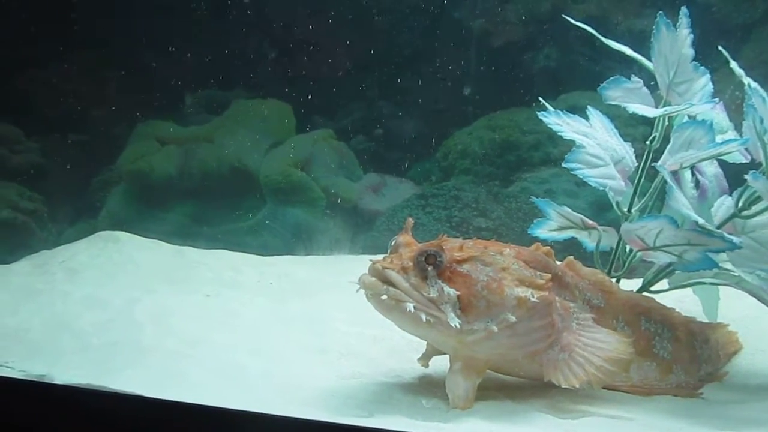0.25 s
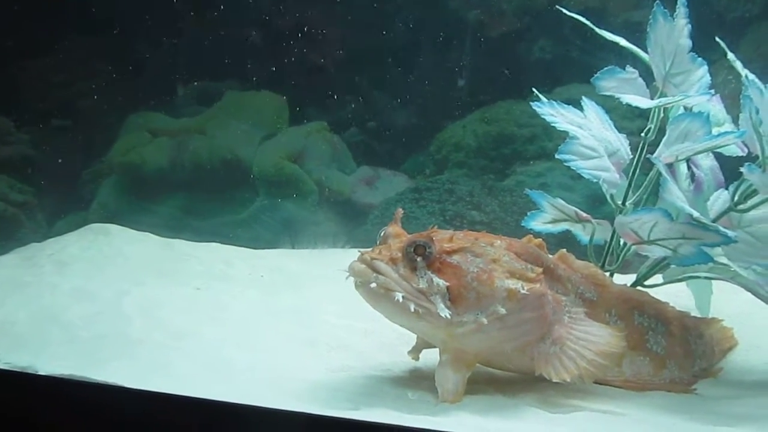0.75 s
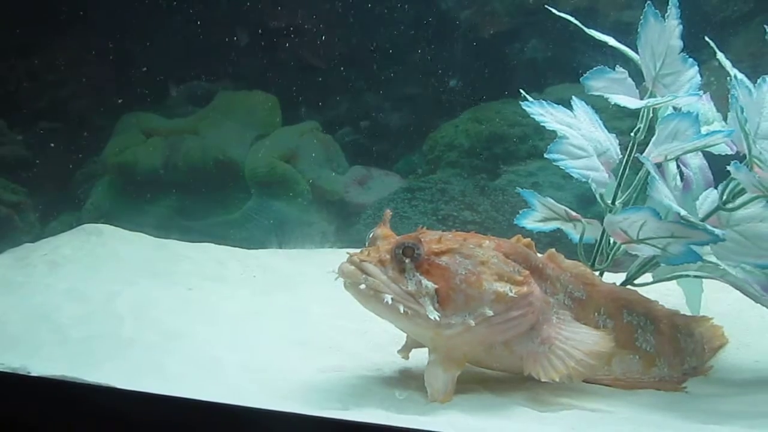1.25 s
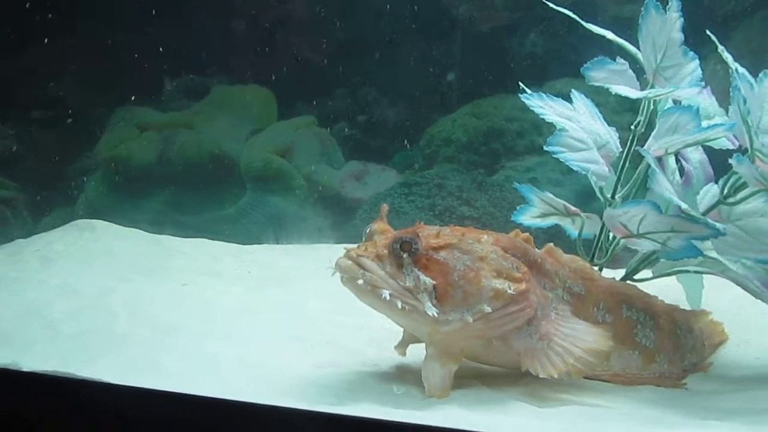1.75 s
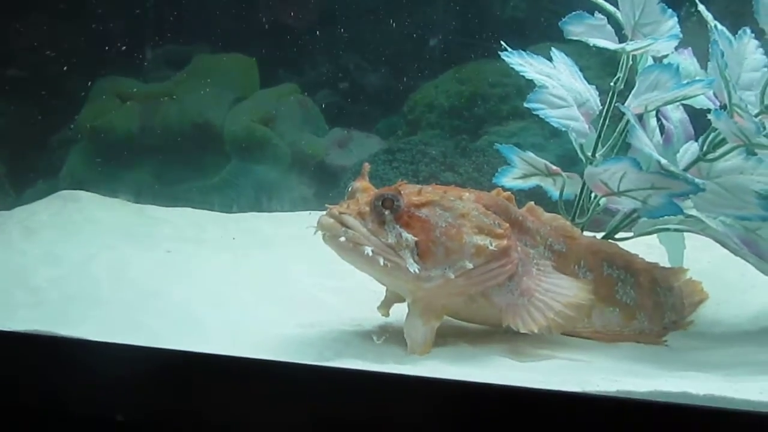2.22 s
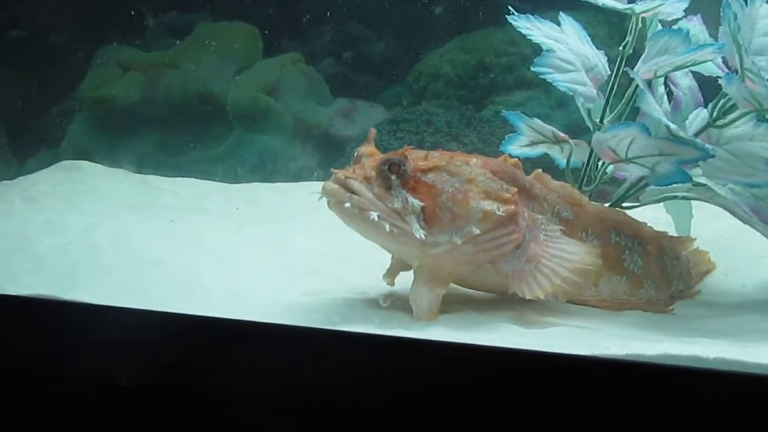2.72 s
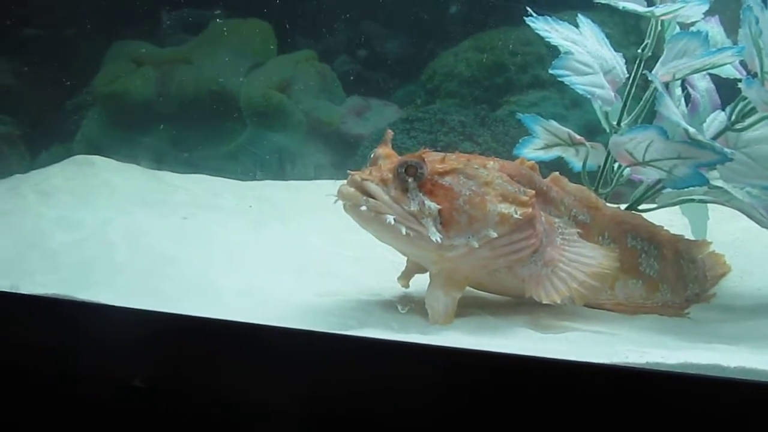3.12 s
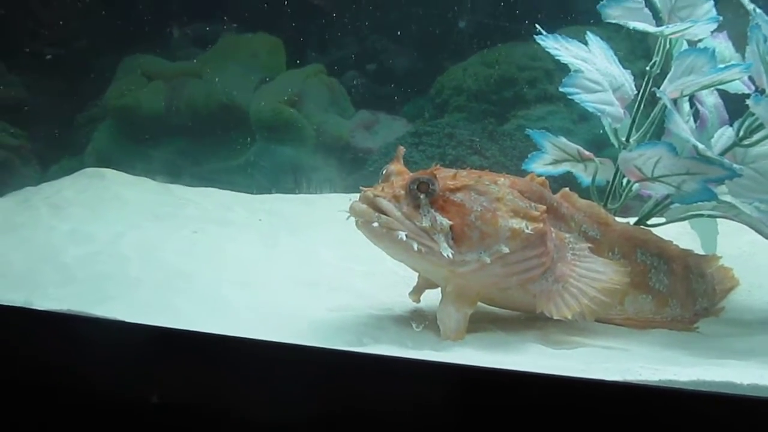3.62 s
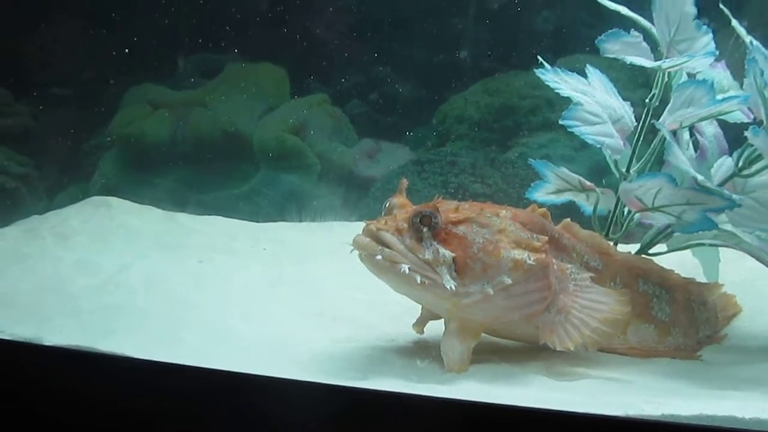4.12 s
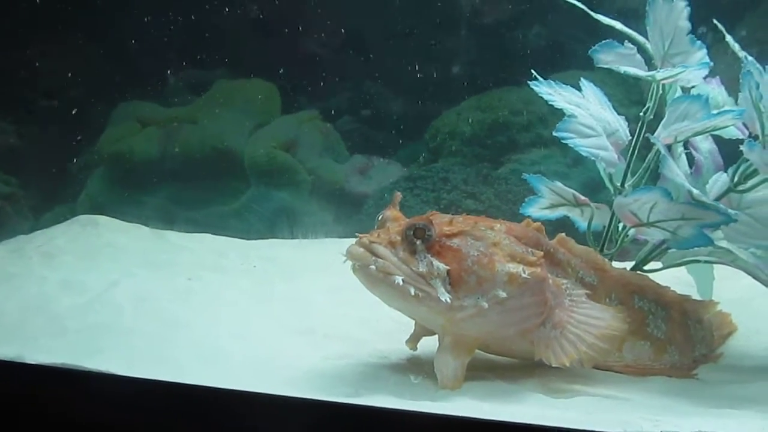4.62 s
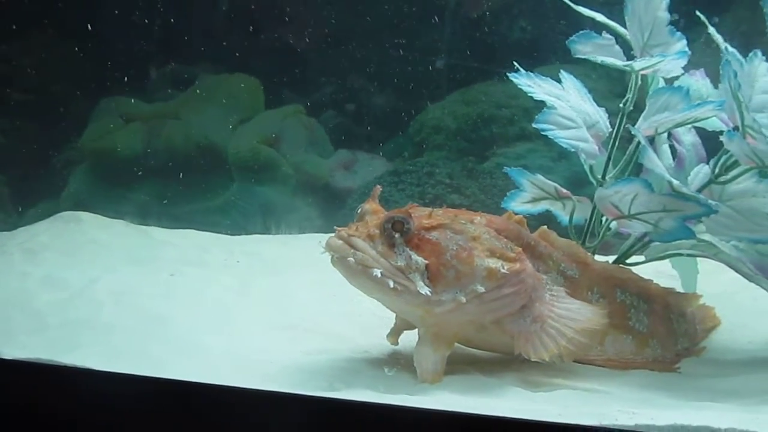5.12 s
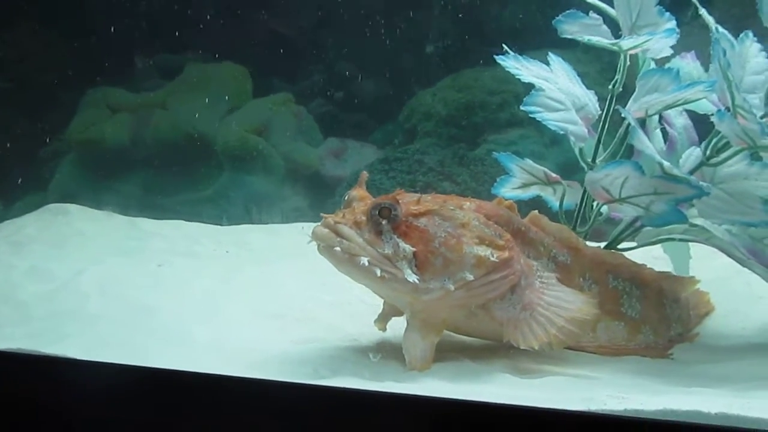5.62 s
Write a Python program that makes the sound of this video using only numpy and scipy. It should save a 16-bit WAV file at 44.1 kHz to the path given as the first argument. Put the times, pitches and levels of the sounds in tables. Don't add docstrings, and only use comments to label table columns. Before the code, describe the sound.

From the start, water trickles and drips close by: many tiny bright plinks, bubbly blips, crackling spray and crisp ticks over a soft wash and a very faint low pump hum. A faint hollow gurgle of air in a pipe swells around 0.3 s and fades by about 1 s; another quieter one rises from 2.2 to 2.8 s. At 1.7 s a small hard object is tapped down with a short, dry click. A tiny creak precedes a sharp, woody knock at 3.8 s, with smaller bumps just after. The flow seems slightly fuller from here, with light contacts around 4.35 to 4.6 s and a faint creak. At 5.5 s a loud, uneven rattling clatter erupts, with two strong thumps, rasping and bright metallic scraping, fading within about a quarter second. A few weak drips and trickling remain to the end, near 5.9 s. Close stereo pickup, small indoor space.

```python
import sys
import numpy as np
from scipy import signal
from scipy.fft import rfft, irfft, next_fast_len
from scipy.io import wavfile
from scipy.ndimage import uniform_filter1d

SR = 44100
rng = np.random.default_rng(int(sys.argv[2]) if len(sys.argv) > 2 else 0)


def makeup_ratio(level_db):
    decades = np.asarray(level_db, float) / 20
    return 10 ** decades


def dump(signal):
    limited = np.clip(np.atleast_2d(signal).T, -1, 1)
    pcm = np.round(limited * 32767).astype(np.int16)
    wavfile.write(sys.argv[1], SR, pcm)


N = 258426
T = np.arange(N) / SR
PADDED = next_fast_len(N, real=True)

# start in seconds, bubble pitch in Hz, peak in dB, length in ms.
DRIPS = [(0.322, 1482, -39.5, 22), (3.115, 1410, -44.5, 8.5), (0.435, 1600, -36, 7.8),
         (0.691, 3400, -46, 3.6), (0.8, 3640, -46, 3.2), (0.898, 2450, -37, 3.4), (1.083, 3570, -44, 2.8),
         (1.313, 3480, -41.5, 4.3), (1.511, 2066, -40, 5.6), (1.573, 2700, -46, 4.1),
         (1.877, 2040, -46.5, 9), (1.904, 3600, -36, 3.5), (1.908, 2950, -37, 3.7), (2.097, 2080, -37, 3),
         (2.162, 3640, -39.5, 3.6), (2.209, 2260, -38, 3.2), (2.317, 2640, -38.5, 4.2),
         (2.493, 2810, -37, 2.8), (2.708, 3570, -41.5, 3.6), (2.919, 1780, -48, 6.7),
         (2.938, 2240, -36.5, 5.7), (3.059, 2280, -41.5, 4.8), (3.136, 3650, -38.5, 3.8),
         (3.183, 2270, -38, 5.7), (3.189, 2440, -33, 2.9), (3.752, 3550, -39, 4.2), (3.912, 2420, -42, 8.3),
         (4.097, 1920, -33.5, 4.5), (4.12, 1960, -42, 4.1), (4.345, 2840, -31, 3.2),
         (4.508, 1870, -37, 3.9), (4.572, 1480, -42, 5), (4.589, 1760, -38, 3.2), (4.613, 1470, -46, 5),
         (5.797, 4820, -50, 4), (5.8076, 2420, -49, 5), (5.848, 4830, -52, 4)]
# start in seconds, pitch in Hz, peak in dB, length in ms.
BUBBLE_RUNS = [(1.905, 930, -45.5, 8), (3.205, 2400, -46, 9), (3.233, 2455, -44, 9.1),
               (3.265, 2420, -51, 9), (4.158, 2950, -49, 4.3), (4.162, 2380, -47, 5),
               (4.206, 2970, -39.5, 4), (4.223, 3030, -41, 8.1), (4.242, 3000, -47, 4.1),
               (4.365, 3040, -43, 5.9), (4.384, 3100, -41, 3.7), (5.367, 1680, -43.5, 8.5),
               (5.385, 1600, -51, 7.9), (5.433, 2370, -41.5, 5), (5.451, 2400, -58, 5.1),
               (5.473, 2400, -44, 3.9)]
# start in seconds, peak in dB, pitch in Hz, length in ms.
GLUGS = [(0.684, -45, 930, 5.8), (2.105, -41.5, 1000, 7.4), (2.18, -41, 764, 9), (2.19, -42.5, 788, 9),
         (2.299, -45.5, 733, 9.7), (2.446, -49, 738, 13.4), (2.511, -46, 1058, 19), (2.587, -41, 880, 7.1),
         (2.757, -46, 1055, 5.9), (3.096, -45, 913, 8), (3.111, -43, 890, 6.1), (3.775, -46, 565, 8.6),
         (4.299, -45, 1060, 8.3), (4.583, -40.5, 1140, 5.4), (4.597, -47, 1087, 19),
         (4.649, -47.5, 724, 12), (4.714, -48, 1040, 8.3), (4.899, -44.5, 725, 12)]
# start in seconds, peak in dB, bubble pitch in Hz.
DROPLETS = [(0.0518, -44, 6150), (0.2124, -45, 4120), (0.4785, -40.5, 4540), (0.5026, -43.5, 7250),
            (0.7128, -55, 4690), (0.7652, -40.5, 4220), (0.7965, -46, 4140), (0.9363, -38.5, 5100),
            (0.995, -41.5, 4570), (1.0575, -45, 6850), (1.1488, -36.5, 6220), (1.255, -45, 4130),
            (1.2805, -36, 6300), (1.3257, -41, 4900), (1.458, -43, 4860), (1.511, -47, 4310),
            (1.5284, -43, 4150), (1.5775, -44, 4330), (1.709, -56, 4100), (1.729, -52, 4200),
            (1.7554, -56, 4820), (1.7976, -38.5, 4870), (1.831, -43, 6730), (1.9006, -61, 4480),
            (2.0208, -51, 4840), (2.1475, -62, 5150), (2.1625, -53, 4150), (2.2525, -38, 4350),
            (2.3535, -45, 5070), (2.4862, -53, 5240), (2.588, -36.5, 4270), (2.7124, -43, 4090),
            (2.757, -44, 4310), (2.8554, -47, 6710), (2.9826, -42, 4940), (3.083, -40, 4900),
            (3.1353, -53, 4050), (3.21, -45, 5240), (3.2405, -59, 4300), (3.4411, -38.5, 4970),
            (3.5314, -44, 5200), (3.7229, -50, 4170), (3.752, -35.5, 5220), (3.8308, -39, 5310),
            (3.9215, -38.5, 6880), (4.0168, -48, 4640), (4.2393, -50, 4930), (4.3316, -38, 4720),
            (4.3445, -39, 5140), (4.588, -41, 4140), (4.6391, -32.5, 4330), (4.7765, -41.5, 4840),
            (4.8793, -39, 6550), (4.977, -40, 4210), (5.2904, -47, 4170), (5.3144, -37.5, 4870)]
# start in seconds, peak in dB, bubble pitch in Hz.
BLIPS = [(0.0992, -44, 2470), (0.1194, -47, 2500), (0.2179, -44.5, 3080), (0.2853, -44, 3730),
         (0.402, -50, 2720), (0.5511, -43.5, 3110), (0.6479, -50, 2620), (0.6714, -48, 2640),
         (0.6888, -43, 2940), (1.2486, -38.5, 2760), (1.2944, -43, 2345), (1.7983, -44, 2240),
         (2.361, -43, 2340), (2.592, -43, 2800), (2.6379, -44, 3220), (2.8863, -45, 3880),
         (2.9108, -49, 2240), (3.0415, -39, 2460), (3.5294, -42, 3500), (4.4802, -51, 2340),
         (4.6379, -32.5, 3730), (4.7785, -40, 3630), (5.1362, -43, 2270), (5.2894, -43, 3860)]
# start in seconds, peak in dB, pitch in Hz.
TICKS = [(0.0687, -50, 10600), (0.2114, -50, 13100), (0.3441, -56, 13500), (0.369, -45.5, 9200),
         (0.407, -47, 10700), (0.4783, -51, 8970), (0.5067, -50, 8320), (0.6584, -41.5, 8400),
         (0.7696, -52, 8850), (0.8375, -54, 8700), (0.8669, -57, 9050), (0.8864, -49, 8750),
         (0.9487, -53, 8800), (1.0575, -59, 8560), (1.199, -50, 8600), (1.2805, -53, 8760),
         (1.327, -47, 8900), (1.3523, -50, 10900), (1.4386, -50, 8900), (1.4637, -49, 8300),
         (1.512, -50, 8390), (1.537, -44, 8500), (1.5728, -50, 10400), (1.7549, -57, 10500),
         (1.804, -49, 8400), (1.8317, -50, 8590), (1.9046, -50, 8200), (2.0223, -50, 8000),
         (2.0634, -44.5, 8900), (2.0877, -52, 11300), (2.2524, -44, 9000), (2.4912, -55, 11200),
         (2.5875, -60, 10500), (2.6858, -56, 8350), (2.8896, -42.5, 10600), (3.033, -50, 9600),
         (3.1278, -52, 10500), (3.357, -48, 8730), (3.3842, -47, 10200), (3.5319, -53, 9120),
         (3.6114, -47, 8720), (3.7623, -49, 8890), (3.93, -47, 12900), (3.9814, -46, 8100),
         (4.0133, -45, 10800), (4.3215, -43, 8160), (4.3445, -47, 8200), (4.5885, -51, 8870),
         (4.6374, -59, 8100), (4.7611, -52, 8850), (4.778, -49, 8420), (4.8424, -52, 8290),
         (4.8833, -51, 11000), (4.9467, -48, 14200), (4.9965, -51, 13000), (5.086, -52, 13800),
         (5.1028, -48, 11500), (5.173, -44, 8640), (5.21, -45, 9400), (5.213, -52, 13500)]
DROPLET_CYCLES, BLIP_CYCLES, TICK_CYCLES = 10.8, 11.8, 7.1
DROPLET_DB, BLIP_DB = -3, -4
TICK_LEFT_DB, PAN_SCATTER_DB = 9, 2
# pitch in Hz, level in dB.
FIZZ = [(600, -9.5), (1500, 1.5), (3000, 3.5), (6000, 2), (12000, -9.5)]
SNAP_DB, SNAP_S = -8.5, 0.0018

# start, swell, hold and fade in seconds, level in dB.
GURGLES = [
    (0.1, 0.055, 0.06, 0.089, -58),
    (0.263, 0.042, 0.13, 0.66, -50.5),
    (2.197, 0.1, 0.42, 0.07, -54),
]
PIPE_HZ, PIPE_WIDTH_HZ = 1520, 230

CLATTER_S, CLATTER_DB, ATTACK_S, HOLD_S, LET_GO_S = 5.498, -27, 0.022, 0.074, 0.028
LET_GO_DB, FADE_DB_PER_S, FADE_DB_PER_S2 = -5, 35.5, 305
SHAKE_DB, SHAKE_T60_S = 4.5, 0.098
# centre in seconds, depth in dB, half length in seconds.
LULLS = [
    (5.531, -3, 0.0036),
    (5.562, -4, 0.0048),
    (5.603, -3.5, .004),
    (5.655, -4.5, .008),
]
# frequency in Hz, density in dB per Hz.
RASP = [(35, -38), (60, -42), (327, -9), (509, -7), (559, -3.5), (1070, -1.5), (3270, -13.5), (5840, -21.5),
        (11200, -35.5), (15500, -50)]
# start in seconds, level in dB, hold in seconds, ringing in dB.
SCRAPES = [
    (5.504, -27, .005, -2),
    (5.51, -9, 0.015, -13),
    (5.532, -3.5, 0.023, 2),
    (5.58, -8.5, 0.022, -4),
    (5.616, -17, 0.0084, -14),
    (5.635, -23, 0.023, -20),
    (5.715, -24, 0.0066, -8),
]
SCRAPE_T60_S = 0.11
# pitch in Hz, width in Hz, level in dB.
METAL = [(4840, 320, -2), (6630, 520, 1), (7540, 190, 2), (10300, 500, -16), (11050, 350, -4),
         (14500, 800, -14)]
# start, swell, hold and fade in seconds, level in dB.
CREAKS = [
    (3.722, .005, 0.0085, .02, -69),
    (3.745, .005, 0.0087, .015, -67),
    (3.775, .004, 0.016, 0.02, -49),
    (4.568, .01, 0.071, 0.045, -52),
]

# start in seconds, strength in dB, contact time in ms.
KNOCKS = [(3.778, -36, 1.2), (3.8311, -9, 1.21), (3.8306, -27, 1.9), (3.8397, -25, 0.52),
          (3.854, -34, 0.37), (3.851, -18, 1.9), (3.8395, -22.5, 0.92), (3.862, -25, 1.4),
          (3.869, -31, 1.7), (4.347, -43, 0.19), (4.35, -27.5, 1.8), (4.399, -28, 1.9), (4.585, -33, 0.44),
          (5.4998, -29, 1), (5.504, -7.5, 1.35), (5.509, -22, 0.44), (5.5123, -24, 0.53),
          (5.5163, -22, 0.41), (5.5384, -15, 0.67), (5.5419, -23, 0.28), (5.564, -6, 0.87),
          (5.5791, -22, 0.61), (5.5902, -18.5, 0.37), (5.593, -25, 0.48), (5.608, -22.5, 0.31),
          (5.6095, -35, 0.28), (5.6245, -27, 0.35), (5.663, -22, 0.64), (5.688, -27, 0.42),
          (5.755, -25, 0.64)]
# pitch in Hz, level in dB, t60 in seconds.
CABINET = [(165, -10, .08), (236, -3.5, .11), (331, -2, .12), (431, -2, .12), (570, 0, .13), (721, -2, .13),
           (767, -2, .13), (840, -4, .12), (910, -1, .11), (1070, 0, .11), (1300, -1, .08), (1510, -1, .08),
           (1700, -2, .07), (2400, -12, .04), (2800, -15, .03)]
DAMPED_S, DAMPED_DB = 3.873, -15

# pitch in Hz, level in dB, t60 in seconds.
TAPPED = [(524, -14, 0.063), (834, -18.5, 0.19), (1040, -10.5, 0.18), (1250, -3.5, 0.043), (1535, -6, 0.1),
          (1760, 4, 0.01)]
TAP_S, TAP_DB = 1.7100, -32
# start in seconds, level in dB, length in seconds.
BUMPS = [
    (0.0, -55.5, 0.037),
    (2.98, -56, 0.16),
    (4.35, -56, 0.079),
    (5.498, -45.5, 0.1),
]

# time in seconds, wash level in dB.
FLOW = [(0.0, -48), (0.55, -48.5), (1.53, -49.5), (1.73, -46.5), (2.17, -49), (2.32, -46), (2.76, -48),
        (2.87, -49.5), (3.82, -44), (5.45, -43.5), (5.63, -51), (5.86, -48.5)]
# frequency in Hz, density in dB per Hz.
WASH = [(12, -47), (20, -13), (171, -9), (274, -10.5), (352, -6.5), (439, -11), (746, -9), (1040, -8.5),
        (1230, -9), (1720, -8.5), (5090, -18), (11100, -29.5), (15500, -44)]
# pitch in Hz, rms level in dB.
HUM = [(120, -73.5), (180, -68.5), (300, -74.5), (360, -65.5)]
# pitch in Hz, width in Hz, rms level in dB.
HOUSING = [(229.6, 8, -67.5), (342.5, 27, -65), (755.4, 111, -62), (1058, 40, -63.5)]

ROOM_T60_S, ROOM_DB, RIGHT_LAG_S = 0.19, -4.5, .00005
# frequency in Hz, side minus mid in dB.
SIDE_SHARE = [(30, -4), (60, -6), (125, -13), (300, -16), (600, -16), (1100, -11), (2000, -1), (4000, 0),
              (8000, -2.5), (12000, -1)]
# frequency in Hz, left minus right in dB.
LEFT_GAIN = [(30, -2.5), (150, -.5), (2000, 0), (8000, 1.3), (13000, 2)]
# centre in Hz, width in Hz.
NOTCHES = [(5905, 190), (7845, 290)]
TOP_HZ = 15750


def level(x, db):
    return x * makeup_ratio(db) / np.sqrt(np.mean(x ** 2))


def on_log(points, hz):
    f, v = np.transpose(points)
    return np.interp(np.log(np.maximum(hz, 1)), np.log(np.maximum(f, 1)), v)


def shaped(x, gain):
    return irfft(rfft(x, PADDED) * gain(np.fft.rfftfreq(PADDED, 1 / SR)), PADDED)[..., :N]


def resonance(x, hz, width_hz):
    return signal.lfilter(*signal.iirpeak(hz, hz / width_hz, fs=SR), x)


def resonance_twice(x, hz, width_hz):
    return resonance(resonance(x, hz, width_hz), hz, width_hz)


def butter(x, order, hz, kind):
    return signal.sosfilt(signal.butter(order, hz, kind, fs=SR, output="sos"), x)


def walk(rate):
    k = int(SR / rate)
    steps = np.repeat(rng.standard_normal(N // k + 1), k)
    return 1.85 * uniform_filter1d(uniform_filter1d(steps, k), k)[:N]


def spells(rows):
    return sum(makeup_ratio(db) * np.interp(T - s, np.cumsum([0, rise, hold, fade]), [0, 1, 1, 0])
               for s, rise, hold, fade, db in rows)


def wide(mid, side):
    return mid + np.outer([1, -1], shaped(side, lambda f: makeup_ratio(on_log(SIDE_SHARE, f))))


def wide_noise():
    return wide(*rng.standard_normal((2, N)))


def clear_drops():
    drops = [(s, hz, db, ms, 0) for s, hz, db, ms in DRIPS]
    drops += [(s, hz, db + DROPLET_DB, 1000 * DROPLET_CYCLES / hz, 0) for s, db, hz in DROPLETS]
    drops += [(s, hz, db + BLIP_DB, 1000 * BLIP_CYCLES / hz, 0) for s, db, hz in BLIPS]
    return drops + [(s, hz, db, 1000 * TICK_CYCLES / hz, TICK_LEFT_DB) for s, db, hz in TICKS]


def add_bubble(out, s, hz, db, ms, pan_db, turn, glide=.02):
    u = np.arange(int(3 * ms * SR / 1000) + 8) / (max(ms, .2) * SR / 1000)
    shape = (u / .75 * np.exp(1 - u / .75)) ** 5
    phase = 2 * np.pi * hz * (1 - glide / 2) * (u + glide * u ** 2 / 2) * ms / 1000
    lag = turn * min(hz / 2500, 1) ** 2
    i = max(int(s * SR), 0)
    n = max(min(len(u), N - i), 0)
    out[0, i:i + n] += (makeup_ratio(db + pan_db / 2) * shape * np.sin(phase - lag / 2))[:n]
    out[1, i:i + n] += (makeup_ratio(db - pan_db / 2) * shape * np.sin(phase + lag / 2))[:n]


def bubbles(flow_db):
    out = np.zeros((2, N))
    clear = clear_drops()
    clear += [(s, hz, db, ms, 0) for s, hz, db, ms in BUBBLE_RUNS]
    clear += [(s, hz, db, ms, 0) for s, db, hz, ms in GLUGS]
    for (s, hz, db, ms, pan_db), luck in zip(clear, rng.standard_normal((len(clear), 5, 4))):
        pan_db += PAN_SCATTER_DB * luck[0, 1]
        add_bubble(out, s, hz, db, ms, pan_db, .5 * luck[0, 0])
        for late, detune, size, turn in luck[1:]:
            near_s, near_hz = s + .003 + .008 * late, hz * (1 + .045 * detune)
            add_bubble(out, near_s, near_hz, db - 7 + 2.5 * size, .7 * ms, pan_db, turn)
    for when, pitch, size, long, pan, turn in rng.random((1700, 6)):
        hz = 600 * 24 ** pitch
        db = -57 + on_log(FIZZ, hz) + 8 * size ** 3 + .4 * flow_db[int(when * N)]
        ms = 1000 * (6 + 14 * long) / hz
        add_bubble(out, when * T[-1], hz, db, ms, 8 * (pan - .5), 2.5 * (turn - .5))
    return out


def spray(flow_db):
    out, t, hiss = 0, T[:SR // 10], wide_noise()
    fade = (1 - np.exp(-t / 0.004)) ** 2 * (np.exp(-t / 0.0035) + 0.1 * np.exp(-t / 0.011))
    for hz, spray_db in [(4500, 5), (7000, 11), (10000, 2.5), (13500, -16)]:
        start = np.zeros(N)
        for s, drip_hz, db, ms, pan_db in clear_drops():
            start[int((s - .002) * SR)] += makeup_ratio(db - 17.3 * abs(np.log2(drip_hz / hz)))
        stray = rng.random((300, 2))
        start[(stray[:, 0] * N).astype(int)] += makeup_ratio(-62.0 + 4.6 * stray[:, 1] ** 4.4)
        grit = hiss * makeup_ratio(5.2 * walk(900))
        burst = makeup_ratio(0.41 * flow_db) * signal.fftconvolve(start, fade)[:N] * grit
        out = out + makeup_ratio(spray_db) * resonance_twice(burst, hz, .3 * hz)
    return out


def snaps():
    out, t, noise = 0, T[:SR // 50], wide_noise()
    snap = t / SNAP_S * np.exp(1 - t / SNAP_S)
    for band_hz, band_db in [(8600, 2), (11000, 5), (13700, 2)]:
        start = np.zeros(N)
        for rows in (TICKS, DROPLETS):
            for s, db, hz in rows:
                start[int(s * SR)] += makeup_ratio(db + SNAP_DB + band_db - 14 * abs(np.log2(hz / band_hz)))
        burst = signal.fftconvolve(start, snap)[:N] * noise
        out = out + butter(burst, 2, [.87 * band_hz, 1.13 * band_hz], "band")
    return out


def gurgle():
    pops = rng.standard_normal((2, N)) * (rng.random(N) < .1) * makeup_ratio(1.5 * walk(28.9))
    ring = resonance_twice(pops, PIPE_HZ, PIPE_WIDTH_HZ) + makeup_ratio(-14) * resonance(pops, 1860, 350)
    return (spells(GURGLES) + makeup_ratio(-64.0)) * level(wide(*ring), -1.5)


def cabinet(push):
    t = T[:SR // 2]
    ring = sum(makeup_ratio(db - 60 * t / t60) * np.sin(2 * np.pi * hz * t) for hz, db, t60 in CABINET)
    return signal.fftconvolve(push, ring)[:N]


def clatter_db():
    t = T - CLATTER_S
    after = np.maximum(t - ATTACK_S - HOLD_S, 0)
    db = CLATTER_DB + np.interp(t, [0, .005, ATTACK_S], [-40, -14, 0], left=-120)
    db = db + LET_GO_DB * np.minimum(after / LET_GO_S, 1)
    db = db - FADE_DB_PER_S * after - FADE_DB_PER_S2 * after ** 2
    return db + sum(dip_db * np.exp(-((T - s) / half) ** 2) for s, dip_db, half in LULLS)


def shaken_parts():
    jolts = np.zeros(N)
    for s, db, ms in KNOCKS:
        jolts[int(s * SR)] += makeup_ratio(db + SHAKE_DB)
    return signal.lfilter([1], [1, -makeup_ratio(-60 / SHAKE_T60_S / SR)], jolts)


def clatter():
    body_db = clatter_db()
    hits = rng.standard_normal((2, N)) * (3.0 + (rng.random(N) < .05))
    hits = hits * makeup_ratio(0.87 * walk(250)) * (1 + shaken_parts())
    rasp = level(shaped(wide(hits[0], 0.84 * hits[1]), lambda f: makeup_ratio(on_log(RASP, f))), 3.4)
    bright = butter(rasp, 2, 3000, "high")
    ring = cabinet(makeup_ratio(body_db) * hits[0]) / np.std(cabinet(hits[0, :SR]))

    metal = sum(level(resonance_twice(bright, hz, w), db - 22.5) for hz, w, db in METAL)
    scraping, ringing = 0, 0
    for s, db, hold, ring_db in SCRAPES:
        stroke = (T > s) * makeup_ratio(CLATTER_DB + db - 60 * np.maximum(T - s - hold, 0) / SCRAPE_T60_S)
        scraping = scraping + stroke
        ringing = ringing + makeup_ratio(ring_db) * stroke

    dull_part = (makeup_ratio(body_db) + spells(CREAKS)) * (rasp - bright)
    bright_part = (makeup_ratio(5.5) * scraping + makeup_ratio(body_db - 4.5)) * bright
    squeal = makeup_ratio(6.5) * ringing * metal
    return dull_part + bright_part + squeal + makeup_ratio(-10) * wide(ring, np.roll(ring, shift=400))


def knocks():
    push = np.zeros(N)
    for s, db, ms in KNOCKS:
        n = max(int(ms * SR / 1000), 2)
        push[int(s * SR):int(s * SR) + n] += makeup_ratio(db) * np.sin(np.pi * (np.arange(n) + .5) / n) / n
    click = np.gradient(uniform_filter1d(push, size=7))
    sound = makeup_ratio(-16.5) * cabinet(push) + makeup_ratio(47.0) * click
    sound = sound * makeup_ratio(DAMPED_DB * (T > DAMPED_S) * (T < DAMPED_S + .2))
    return butter(sound, 3, 210, "high")


def tap():
    t = np.maximum(T - TAP_S, 0)
    ring = sum(makeup_ratio(db - 60 * t / t60) * np.sin(2 * np.pi * hz * t) for hz, db, t60 in TAPPED)
    crack = makeup_ratio(11.0 - 60 * t / 0.0049) * np.sin(2 * np.pi * 2300 * t)
    tail = (t > 0) * (makeup_ratio(-7 - 60 * t / 0.04) + makeup_ratio(-13.5 - 60 * t / 0.42))
    grit = tail * level(resonance(rng.standard_normal(N), 1240, 1800), 0)
    return makeup_ratio(TAP_DB) * butter(ring + crack + grit, 3, [450, 4000], "band")


def bumps():
    swell = sum(makeup_ratio(db) * np.exp(-((T - s - long / 2) / long * 2) ** 2) for s, db, long in BUMPS)
    return swell * level(resonance(rng.standard_normal(N), 120, 170), 0)


def wash(flow_db):
    out, f = 0, np.fft.rfftfreq(PADDED, 1 / SR)
    spectrum = rfft(shaped(wide_noise(), lambda f: makeup_ratio(on_log(WASH, f))), PADDED)
    for octave in np.arange(0, 10, .5):
        bell = np.clip(1 - np.abs(np.log2(f / 25 + 1e-9) - octave) * 2, 0, 1)
        follow = min(octave / 5, 1 + .03 * max(octave - 6, 0) ** 2)
        flicker_db = (.7 + .08 * octave) * walk(9) + follow * flow_db
        out = out + makeup_ratio(flicker_db) * irfft(spectrum * bell, PADDED)[:, :N]
    return level(out, -50)


def pump():
    lines = 0
    for k, (hz, db) in enumerate(HUM):
        lines = lines + np.sqrt(2) * makeup_ratio(db + 0.51 * walk(3.1)) * np.sin(2 * np.pi * hz * T + k)
    noise = wide_noise()
    return lines + sum(level(resonance_twice(noise, hz, w), db) for hz, w, db in HOUSING)


def room(x):
    t = T[:SR // 2]
    tail = rng.standard_normal((2, len(t))) * makeup_ratio(-60 * t / ROOM_T60_S) * (t > .003)
    tail = tail / np.linalg.norm(tail[0])
    mid, side = signal.fftconvolve(x.mean(0, keepdims=True), tail, axes=1)[:, :N]
    return x + makeup_ratio(ROOM_DB) * wide(mid, side)


def scene():
    s, flow_db = np.transpose(FLOW)
    flow_db = np.interp(T, s, flow_db - flow_db.mean())
    tank = room(bubbles(flow_db) + spray(flow_db) + snaps() + knocks() + tap())
    tank = tank + gurgle() + wash(flow_db) + pump()
    tank[1] = shaped(tank[1], lambda f: np.exp(-2j * np.pi * f * RIGHT_LAG_S))
    rattle = clatter()
    rattle[0] = np.roll(rattle[0], 4)
    return tank + butter(rattle, 2, 110, "high") + wide(bumps(), bumps())


def roll_off(x):
    return signal.sosfilt(signal.butter(12, 15740, fs=SR, output="sos"), x)


def record(dry):
    mix = shaped(dry, lambda f: makeup_ratio(np.outer([.5, -.5], on_log(LEFT_GAIN, f))) * (f < TOP_HZ))
    for hz, width_hz in NOTCHES:
        mix = signal.lfilter(*signal.iirnotch(hz, hz / width_hz, fs=SR), mix)
    return roll_off(mix)


dry = scene()
out = record(dry)
dump(out)
```